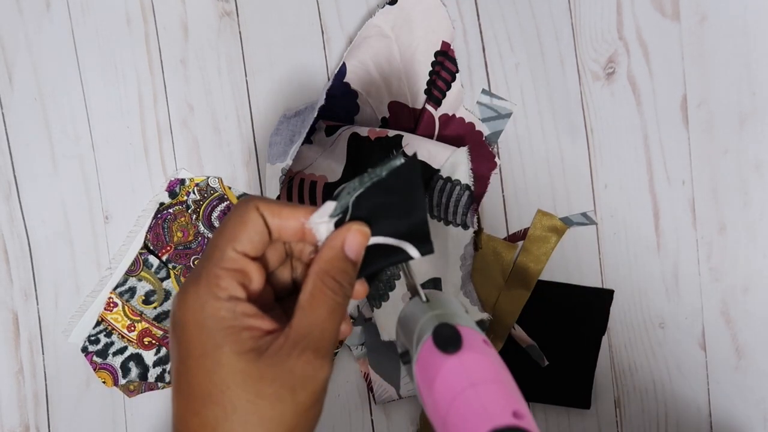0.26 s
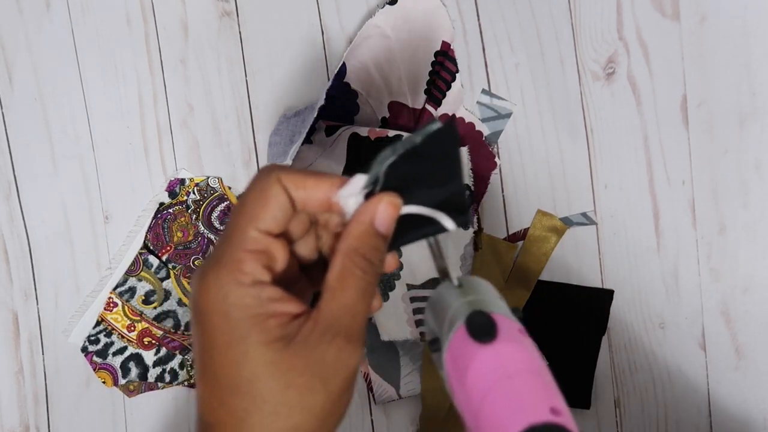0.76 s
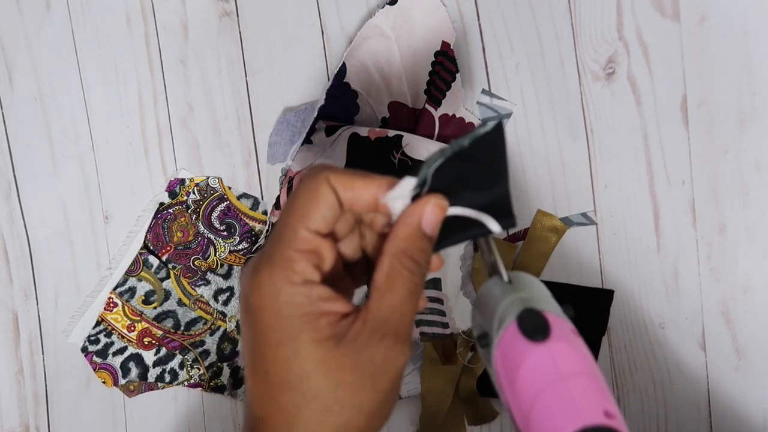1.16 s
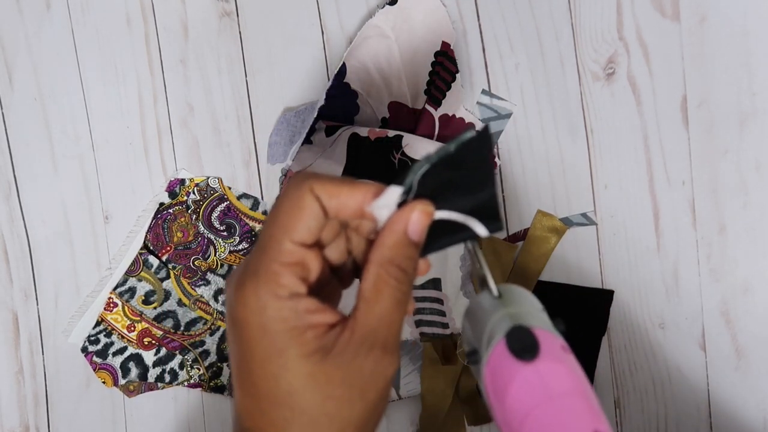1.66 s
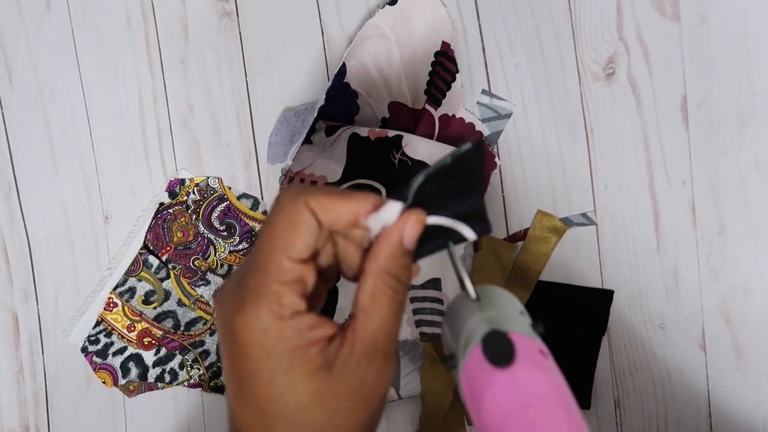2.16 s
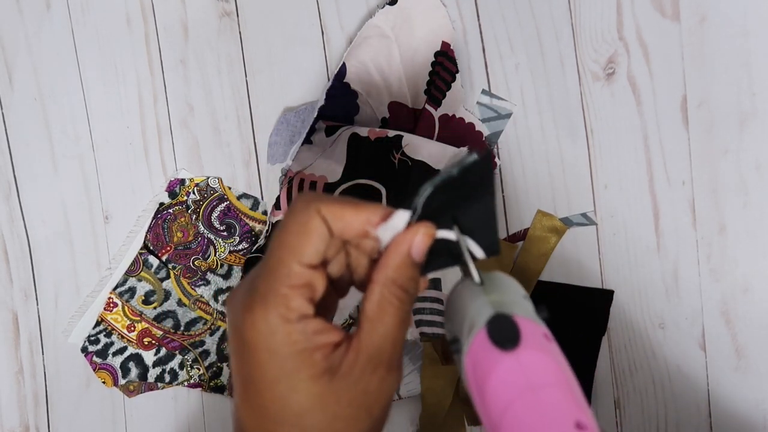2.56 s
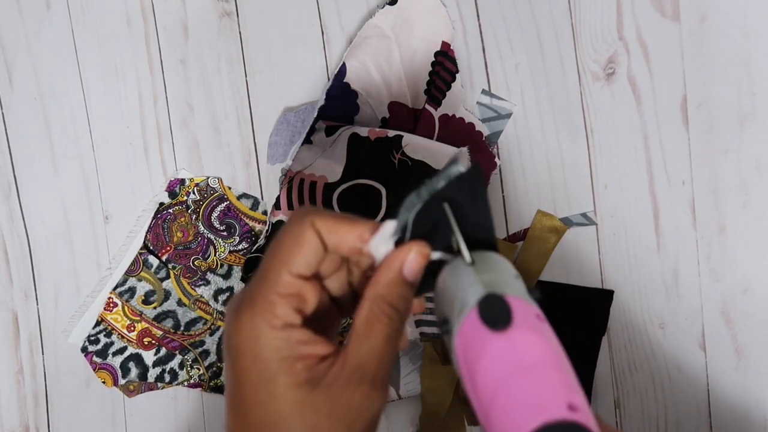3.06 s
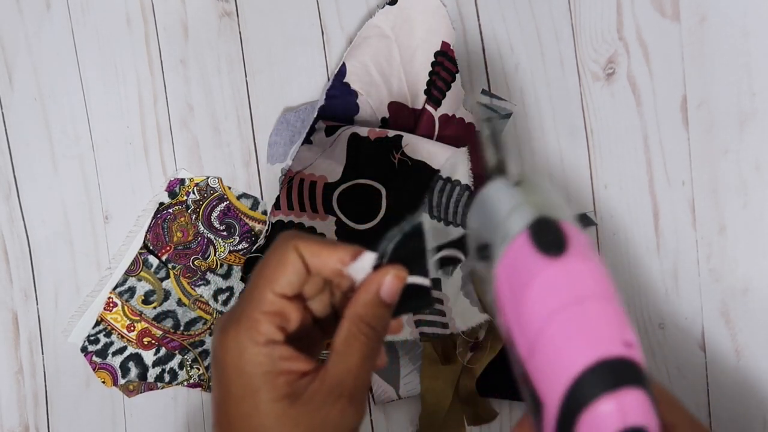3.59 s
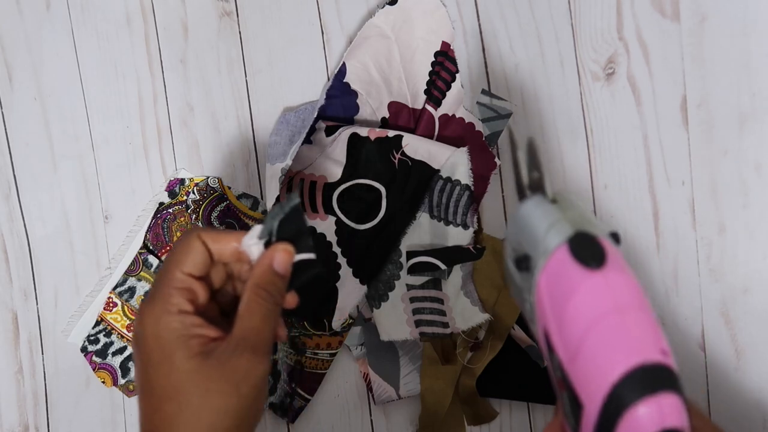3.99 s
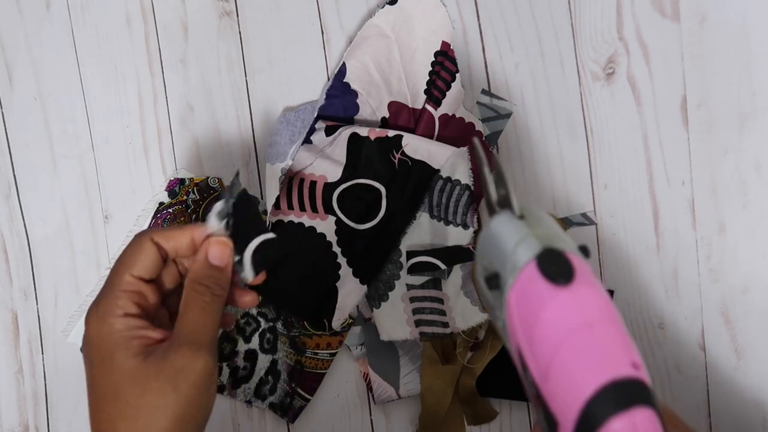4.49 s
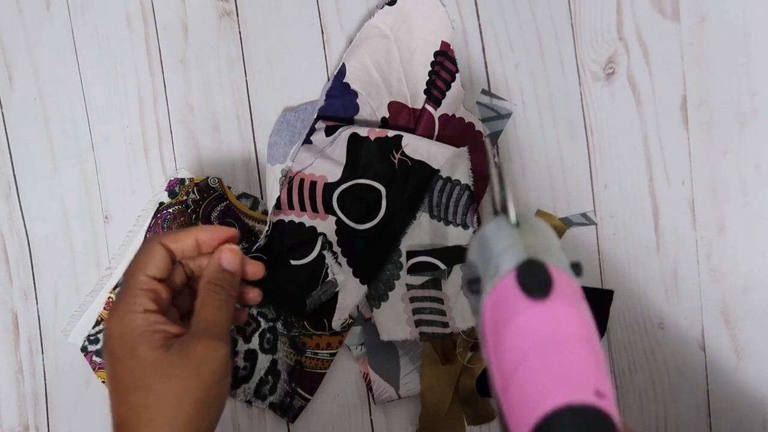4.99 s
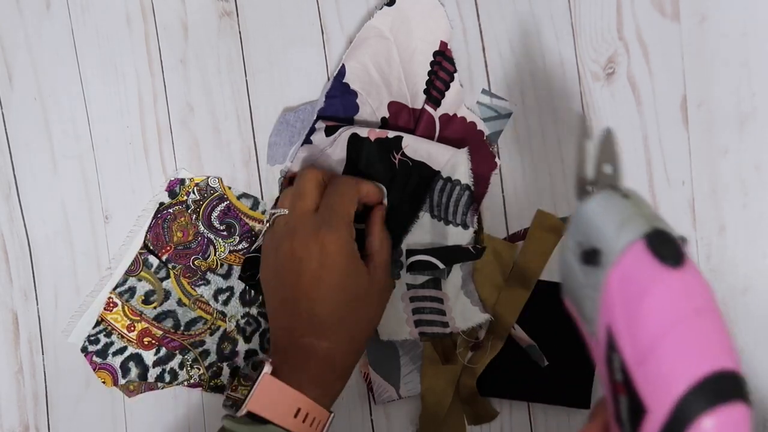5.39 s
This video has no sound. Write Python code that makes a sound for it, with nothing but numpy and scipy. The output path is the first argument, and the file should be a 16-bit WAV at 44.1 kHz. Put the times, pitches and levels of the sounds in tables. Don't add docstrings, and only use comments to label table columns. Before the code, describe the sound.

A small battery cutter buzzes hard and close, squeals briefly as it bites cloth, then shuts off with a clunk and slowing clicks.

```python
import sys
import numpy as np
from scipy import signal
from scipy.fft import rfft, irfft, next_fast_len
from scipy.io import wavfile
from scipy.ndimage import uniform_filter1d, map_coordinates

SR = 44100
rng = np.random.default_rng(int(sys.argv[2]) if len(sys.argv) > 2 else 0)


def int16_out(signal):
    q = np.round(np.clip(np.atleast_2d(signal).T, -1, 1) * 32767)
    wavfile.write(sys.argv[1], SR, q.astype(np.int16))


def magnitude_from_level(level_db):
    exponent = np.asarray(level_db, float) / 20
    return 10 ** exponent


N = 248944
STEP = 64


def unit(x):
    return x / np.sqrt(np.mean(x ** 2) + 1e-20)


def along(points, hz):
    f, v = np.transpose(points)
    return np.interp(np.log(hz + 1), np.log(f + 1), v)


def curves(rows):
    s, *cols = np.transpose(rows)
    return [np.interp(np.arange(N) / SR, s, c) for c in cols]


def full(slow):
    return np.interp(np.arange(N), np.arange(len(slow)) * STEP, slow)


def switch(s, fade):
    return np.clip((np.arange(N) / SR - s) / fade + .5, 0, 1)


def wobble(rate):
    knots = rng.standard_normal(int(N * rate / SR) + 4)
    return map_coordinates(knots, [np.arange(N) * rate / SR])


def drift(rate):
    knots = rng.standard_normal(int(N * rate / SR) + 2)
    return np.interp(np.arange(0, N, STEP) * rate / SR, np.arange(len(knots)), knots)


def filtered(x, response):
    m = next_fast_len(N + SR // 2)
    return irfft(rfft(x, m) * response(np.fft.rfftfreq(m, 1 / SR)), m)[..., :N]


def noise(spectrum, gate=1):
    closed = [(spectrum[0][0] / 2, -120)] + list(spectrum) + [(SR / 2, -120)]
    return unit(filtered(gate * rng.standard_normal(N), lambda hz: magnitude_from_level(along(closed, hz))))


def banded(x, depth_db):
    z = signal.stft(x, nperseg=512)[2]
    field = uniform_filter1d(rng.standard_normal(z.shape), size=4, axis=0)
    field = uniform_filter1d(field, size=90, axis=1)
    return unit(signal.istft(z * magnitude_from_level(depth_db * unit(field)), nperseg=512)[1][:N])


# (time [s], lean [-1 to 1])
LEAN = [(0, -1.1), (0.5, -0.82), (1, -0.12), (1.5, 0.34), (1.9, 0.6), (2.55, 0.82), (2.6, -0.12),
        (2.9, -0.26), (3.1, 0.021), (3.45, 0.38), (3.5, 0.03), (3.75, 0.12), (3.9, -0.6), (4.1, -0.69),
        (4.3, -0.38), (4.5, 0.3), (4.7, 0.54), (4.99, 0.88)]
CATCH_S, CATCH_FADE_S = 2.575, .05
THROUGH_S, THROUGH_FADE_S = 3.48, .1


def grip():
    caught = switch(CATCH_S, CATCH_FADE_S)[::STEP]
    through = switch(THROUGH_S, THROUGH_FADE_S)[::STEP]
    lean = curves(LEAN)[0][::STEP]

    def stage(v):
        return (1 - caught) * v[0] + (caught - through) * v[1] + through * v[2]

    def leaning(v):
        return lean * ((1 - caught) * v[3] + caught * v[4])

    return stage, leaning


# (running free [dB], in the cloth [dB], cut through [dB], growth with lean before the catch, after it)
SHELL_ORDERS = [(-30.5, -31.5, -31.5, 0.07, -0.18), (-29, -27, -34.5, 0.23, -0.26),
                (-11.5, -10.5, -12.5, -0.02, -0.11), (-25.5, -34.5, -45, -0.31, -0.16),
                (-16.5, -22, -16.0, -0.21, 0.1), (-15.0, -10.5, -14.0, 0.38, 0.81),
                (-10.0, -3.5, -5.0, -0.15, -0.59), (-3.0, -0.5, -2.0, -0.03, -0.1),
                (-6.0, -3.0, -8.5, -0.16, -0.22), (-17.5, -8, -12, -1.14, 0.38),
                (-1.5, 1.5, -1.0, 0.13, 0.11), (-0.0, -10.0, -7.0, -0.29, -0.22),
                (-11, -3, 2.0, 1.12, -0.47), (-10.5, -22.0, -17.0, 0.11, 1.05),
                (-5.5, -4.0, -12.5, -0.54, 0.54), (-8, -11.5, -8.5, -0.13, 0.04)]
STEEL_ORDERS = [(-5.5, -8, -6.0, -0.35, -0.47), (-4.5, -12.5, -3.0, 0.14, -0.07),
                (-13, -13.5, -10.5, -0.76, 0.62), (-17, -18.5, -19, -0.36, -0.26),
                (-7.5, -5.0, -5.0, -0.65, -0.5), (-1, -13.0, -10.5, -0.09, -0.9),
                (-13.5, -16.0, -11, -0.88, -0.28), (-8.5, -14.0, -18.0, 0.72, 0.08),
                (-11.5, -7, -13.0, -0.97, 0.02), (-7.5, -16.5, -5.5, 0.21, 0.22),
                (-2.5, -10.0, -9, 0.03, 0.63), (-8, -4.5, -5.5, 0.43, 1.13), (-6.5, -0.5, -4, -0.32, -0.09),
                (-23.0, -5.5, -12.0, -0.25, 0.28), (-15.5, -13.5, -14, 0.13, -1.04),
                (-10.5, -15.0, -19, 0.56, 0.26), (-8, -6.0, -11.5, -0.05, -0.12),
                (-17, -15.5, -14.0, -0.06, 0.02), (-19.5, -20.0, -18.0, -0.15, -0.3),
                (-11.0, -25.5, -18, 0.81, 0.28), (-14.5, -16, -7.5, 0.23, 0.045),
                (-20.0, -27, -11.5, 1.13, -0.05), (-18.5, -19.5, -18.5, -0.01, -0.61),
                (-14.5, -16.0, -17.0, -0.13, 0.05)]
# (frequency [Hz], level [dB])
BLADE = [(6300, -21), (7150, -14), (8300, -25.5), (11000, -25.5), (13000, -30), (15500, -46)]
# (running free [dB], in the cloth [dB], cut through [dB])
BLADE_STAGE_DB = (-0.9, -3, -2.5)
ALIKE = (0.85, 1.1, 0.87, -0.3, -.15)
PULL = (-np.pi, 0, 0, 0, 0)
# (time [s], lag [turns])
STEEL_LAG = [
    (0, .45),
    (2.55, 0.44),
    (2.6, .31),
    (4.99, .07),
]


def blows(turns, stage, leaning, count=92):
    alike = stage(ALIKE) + leaning(ALIKE)
    lag = curves(STEEL_LAG)[0][::STEP]
    press_db = 5.5 * np.exp(-((np.arange(0, N, STEP) / SR - 2.55) / .2) ** 2)
    angle = 2 * np.pi * (turns + 0.001 * wobble(160) + 0.0013 * wobble(25))
    spin, order = np.exp(1j * angle), np.ones(N, complex)
    rows = SHELL_ORDERS + STEEL_ORDERS
    x = np.zeros(N)
    for k in range(1, count + 1):
        if k <= len(rows):
            row = rows[k - 1]
        else:
            high_db = along(BLADE, 155.4 * k) + np.array(BLADE_STAGE_DB) + 3 * rng.standard_normal(size=3)
            row = np.r_[high_db, .4 * rng.standard_normal(size=2)]
        level = stage(magnitude_from_level(row)) * np.abs(1 + leaning(row))
        level = level * magnitude_from_level(1.3 * drift(4.534) + press_db * (k <= 2))
        late = 2 * np.pi * lag * max(k - 16, 0)
        phase = alike * (k % 2) + rng.normal(0, 0.76 + 0.011 * k) + 0.33 * drift(3.56)
        phase = phase + stage(PULL) * (k > 6) - late
        order = order * spin
        x += (full(level * np.exp(1j * phase)) * order).real
    return unit(x)


# (frequency [Hz], density [dB per Hz])
RATTLE = [(150, -33.5), (500, -26.5), (800, -13.5), (1100, -8.5), (2000, -5), (2800, 0.5), (4200, -1),
          (5200, -1.5), (6200, -12), (7500, -23.5), (9500, -39)]


def loose_rattle(struck, beat):
    uneven = filtered(struck * wobble(420), lambda hz: hz ** 4 / (hz ** 4 + 1100 ** 4))
    rattle = magnitude_from_level(-5.5) * banded(noise(RATTLE, beat(1.4, 2.8)), depth_db=2.3) + magnitude_from_level(-15.5) * uneven
    low = filtered(rattle, lambda hz: 900 ** 6 / (hz ** 6 + 900 ** 6))
    return rattle - 0.33 * switch(CATCH_S, CATCH_FADE_S) * low


# (frequency [Hz], density [dB per Hz])
HISS = [(3530, -36), (6000, -2), (6450, -5), (7130, -0.5), (8760, -6), (12400, -3), (14600, -10),
        (15700, -11.5)]


def blade_hiss(depth_db):
    return banded(noise(HISS), depth_db)


# (time [s], speed [turns a second])
SPEED = [(0.05, 153.3), (0.42, 153.2), (2.41, 152.2), (2.46, 152.9), (2.55, 152.5), (2.62, 154.6),
         (2.68, 155.2), (3.34, 154.8), (3.86, 153.8), (4.16, 153.9), (4.89, 152.7), (4.95, 153.1)]
# (running free [dB], in the cloth [dB], cut through [dB], lean before the catch [dB], after it [dB])
HISS_DB = (-26.5, -25, -29, 1, 0)
RATTLE_DB = (-2.5, -4.5, -3.5, -0.6, -.5)


def motor():
    stage, leaning = grip()
    hiss_db = full(stage(HISS_DB) + leaning(HISS_DB))
    rattle_db = full(stage(RATTLE_DB) + leaning(RATTLE_DB))
    turns = np.cumsum(curves(SPEED)[0]) / SR

    def beat(once_db, twice_db):
        return magnitude_from_level(once_db * np.cos(2 * np.pi * turns) + twice_db * np.cos(4 * np.pi * turns))

    struck = blows(turns, stage, leaning)
    rattle = loose_rattle(struck, beat)
    running = 1 - switch(4.996, fade=.006)
    sliding = magnitude_from_level(hiss_db - 1.9 + 0.68 * wobble(30)) * beat(1.96, 1.8)
    driven = magnitude_from_level(-13) * (struck + magnitude_from_level(rattle_db) * rattle) * running
    return driven + bite(turns), sliding * running


# (frequency [Hz], density [dB per Hz])
RUMBLE = [(13, -48), (22, -22.5), (54, -4.5), (118, -8.5), (130, -6.5), (170, -34.5), (290, -120)]
ROOM = [(76, -47), (130, -14.5), (229, -9), (302, -10), (921, -21.5), (1310, -19.5), (3920, -29),
        (12700, -42), (14000, -52)]


def room():
    air_db = -61.5 + 19.5 * np.maximum(np.arange(N) / SR - 5.3, 0)
    rumble = magnitude_from_level(-63 + 1.2 * wobble(2.2) + 2.6 * wobble(7.5)) * noise(RUMBLE)
    return rumble + magnitude_from_level(air_db) * noise(ROOM), magnitude_from_level(air_db - 3.0) * noise(ROOM)


# (time [s], length [s], shaft order, level [dB])
BITE = (2.582, .045, 13, -16)


def bite(turns):
    s, length, order, db = BITE
    swell = np.exp(-((np.arange(N) / SR - s) / (length / 2)) ** 4)
    return magnitude_from_level(db) * swell * np.cos(2 * np.pi * round(order) * turns)


RELEASE_S, HALT_S = 4.9926, 5.2397
BRAKING = 522
LAST_TURN = .0046


def clicks(count=40):
    half = np.arange(count)
    left_s = np.sqrt(2 * (LAST_TURN + half / 2) / BRAKING)
    speed, back = BRAKING * left_s, half % 2
    click_db, knee = -11.5, 11
    db = click_db + 20 * 2.2 * np.log10(speed / (speed + knee)) - 3.5 * back
    db = np.maximum(db + rng.normal(0, .9, count), click_db - 29)
    knock_db = -9.5 - 0.5 * back + 17.5 * np.exp(-speed / knee)
    rows = [row for row in zip(HALT_S - left_s, db, knock_db) if row[0] > RELEASE_S]
    clunk = (RELEASE_S, -12, 3.5)
    return rows + [clunk]


def modes(table):
    def response(f):
        total = 0
        for k, (c, w, db) in enumerate(table):
            total = total + (-1) ** k * magnitude_from_level(db) * 1j * f * w / (c * c - f * f + 1j * f * w)
        return total

    return response


# (frequency [Hz], width [Hz], level [dB])
SHELL = [(455, 170, -9.5), (1030, 170, 7.5), (1540, 510, -2)]
STEEL = [(2650, 590, 4.5), (3630, 700, 6), (4520, 800, 3), (6200, 900, -6.5), (9000, 4000, -26.5)]
# (frequency [Hz], density [dB per Hz])
WHIRR = [(150, -76), (250, -50.5), (349, -14), (473, -30), (690, -9), (775, -25.5), (991, -5), (2170, -6.5),
         (2780, -2.5), (3820, -12), (4540, -10.5), (8000, -27), (10400, -60.5), (17600, -120)]


def coasting():
    steel, shell, t = np.zeros(N), np.zeros(N), np.arange(SR // 50) / SR
    for s, db, knock_db in clicks():
        i = round(s * SR)
        steel[i:i + len(t)] += magnitude_from_level(db + 1.0 - 60 * t / 0.019) * rng.standard_normal(len(t))
        steel[i] += magnitude_from_level(db + 2.5)
        shell[i] = magnitude_from_level(db + knock_db + 29.5)
    coast_s = HALT_S - RELEASE_S
    speed = np.clip((HALT_S - np.arange(N) / SR) / coast_s, 0, 1)
    turns_left = (speed * coast_s) ** 2 * BRAKING / 2 - LAST_TURN
    beat_db = 3.5 * (np.cos(2 * np.pi * (turns_left + .12)) - 1)
    free = switch(4.996, fade=.006) * (1 - switch(5.222, fade=.03))
    whirr = magnitude_from_level(-17 + 0.99 * wobble(150) + beat_db) * speed ** 1.25 * noise(WHIRR) * free
    dragging = magnitude_from_level(-32) * speed ** 1.9 * free
    return filtered(steel, modes(STEEL)) + filtered(shell, modes(SHELL)) + whirr, dragging


def table_echo(tool):
    t = np.arange(SR // 10) / SR
    scatter = rng.standard_normal(len(t)) * magnitude_from_level(-60 * t / .12)
    return signal.fftconvolve(tool, scatter / np.linalg.norm(scatter))[:N]


# (frequency [Hz], level [dB])
APART = [(60, -31), (150, -26.5), (400, -22), (800, -22), (1300, -32.5), (2500, -25), (4200, -20.5),
         (5500, -20), (7000, -30.5), (9000, -61)]
# (frequency [Hz], level [dB])
PORTS = [(4000, -59.5), (7600, -32), (8400, -3.5), (12000, -2.5), (15500, -6.5)]
# (time [s], level [dB])
OFF_AXIS = [
    (0, -4),
    (3.15, -11.5),
    (3.3, -14),
    (3.5, -21.5),
    (3.65, -3.5),
    (5.64, 1),
]


def scene():
    driven, sliding = motor()
    free, dragging = coasting()
    hush, hush_side = room()
    rubbing = sliding + dragging
    tool = driven + free + rubbing * blade_hiss(depth_db=4.5)
    echo = table_echo(tool)
    unlike = magnitude_from_level(7.0) * rubbing * blade_hiss(depth_db=3.5)
    askew = filtered(tool + unlike, lambda hz: 1j * magnitude_from_level(along(PORTS, hz)))
    side = filtered(echo, lambda hz: magnitude_from_level(along(APART, hz))) + askew * magnitude_from_level(curves(OFF_AXIS)[0])
    tool = tool + magnitude_from_level(-11.5) * echo * switch(5.02, fade=.05)
    ports = np.array([tool + side, tool - side]) * magnitude_from_level([[.42], [-.42]])
    return ports + [hush + hush_side, hush - hush_side]


def roll_off(x):
    return signal.sosfilt(signal.butter(12, 15840, fs=SR, output="sos"), x)


def record(dry):
    heard = filtered(dry, lambda hz: 1 / np.sqrt(1 + (hz / 14900) ** 60))
    held = heard / (1 + np.abs(heard / .99) ** 12) ** (1 / 12)
    return roll_off(held)


dry = scene()
out = record(dry)
int16_out(out)
```